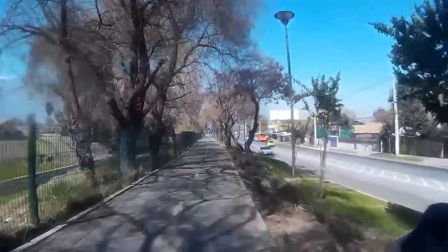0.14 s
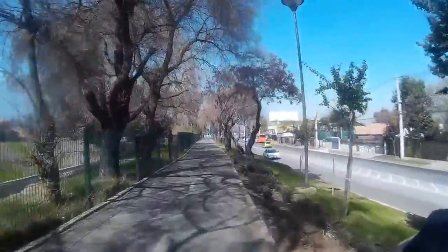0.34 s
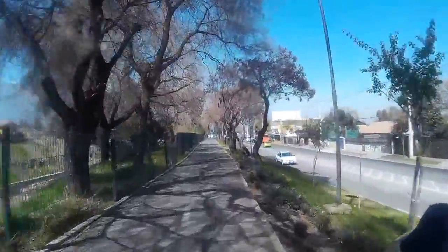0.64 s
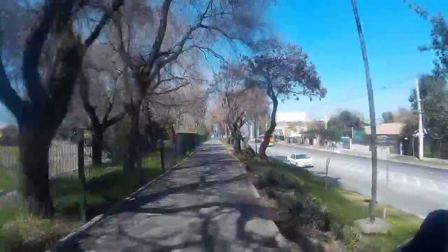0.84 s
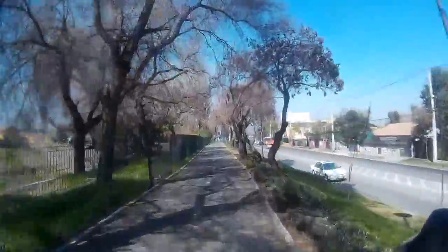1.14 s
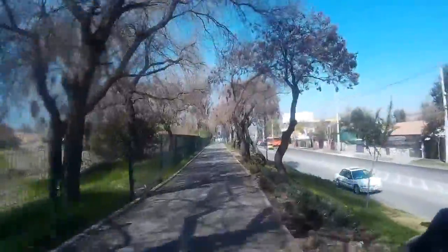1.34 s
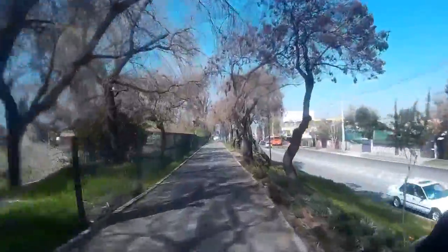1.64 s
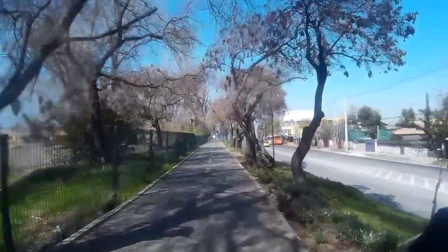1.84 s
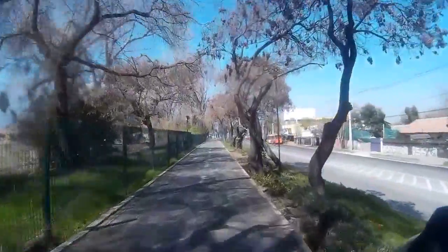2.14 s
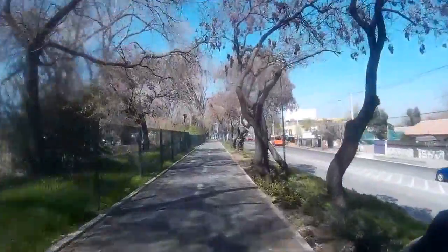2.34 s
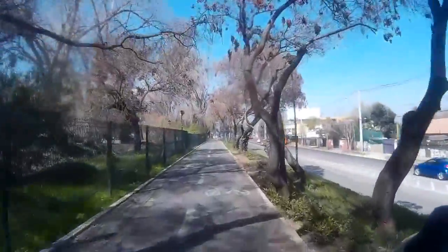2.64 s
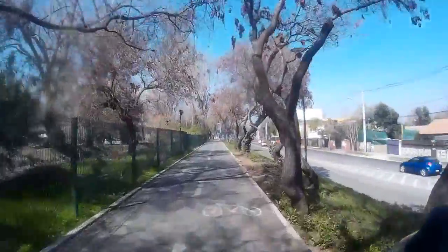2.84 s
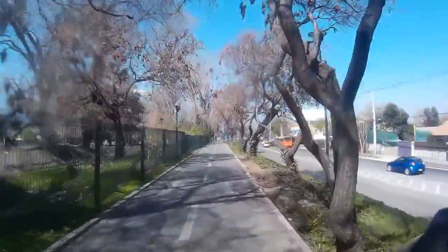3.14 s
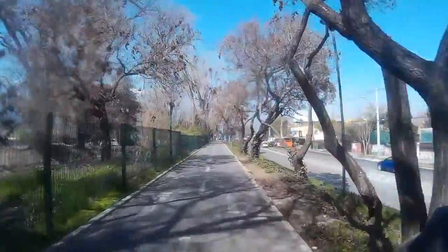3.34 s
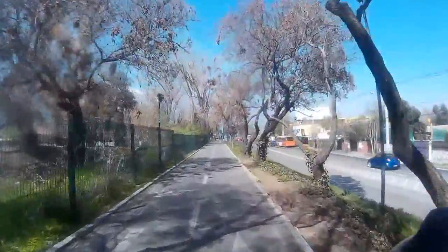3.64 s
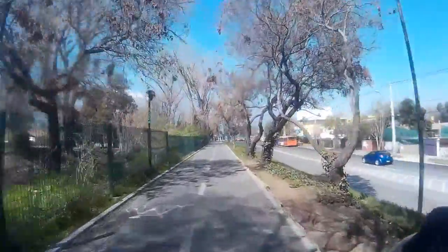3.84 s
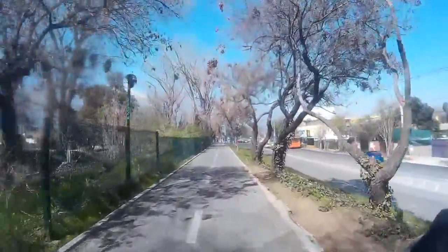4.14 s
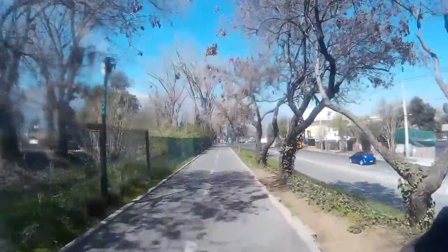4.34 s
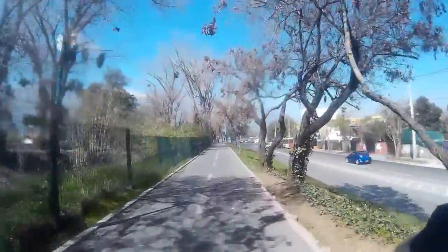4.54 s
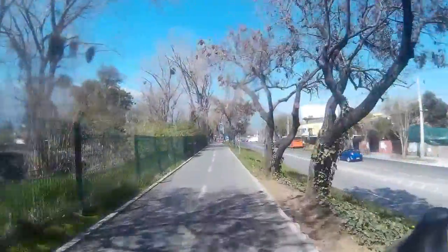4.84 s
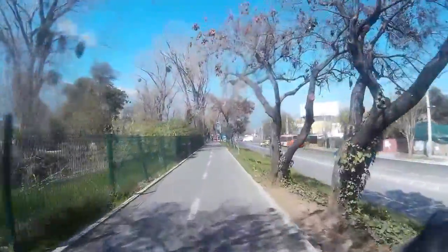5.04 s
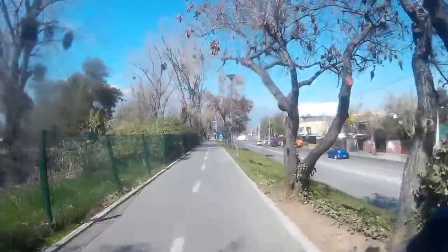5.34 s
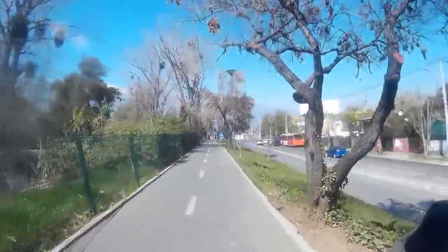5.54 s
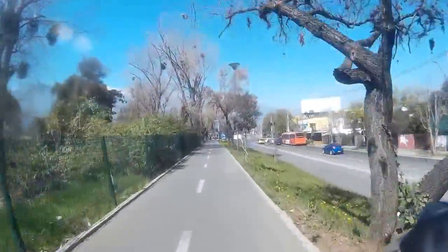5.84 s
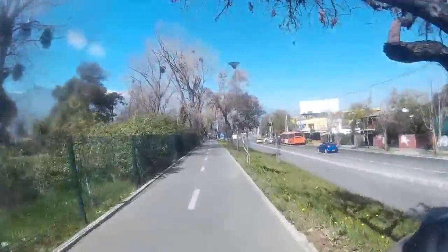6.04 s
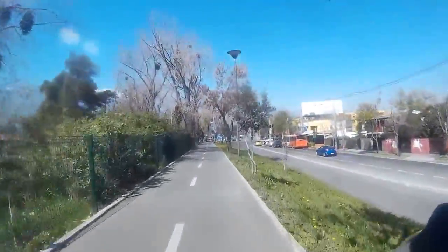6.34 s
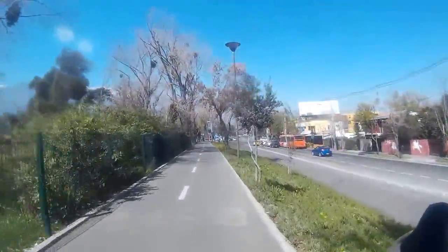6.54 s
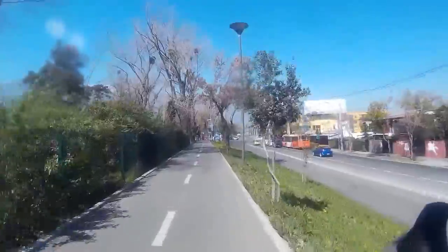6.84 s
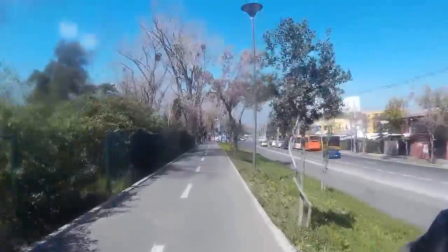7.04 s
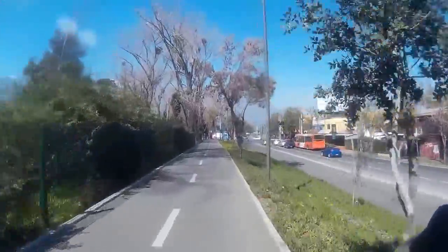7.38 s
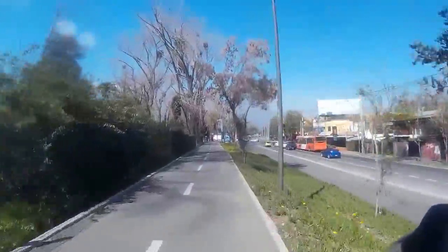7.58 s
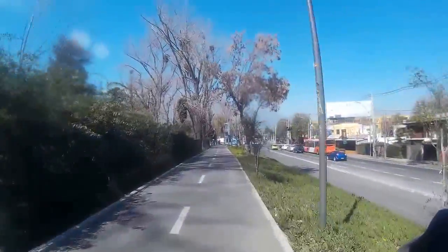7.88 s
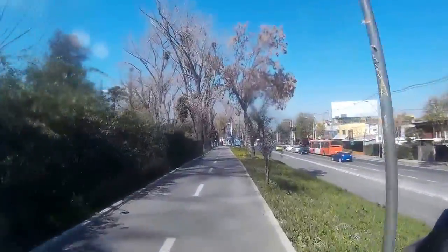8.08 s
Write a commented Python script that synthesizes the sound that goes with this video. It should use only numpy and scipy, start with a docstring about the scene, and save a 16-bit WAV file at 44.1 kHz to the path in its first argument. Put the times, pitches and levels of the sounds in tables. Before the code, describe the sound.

A bicycle rolls along a paved path with a muffled wavering low hum, rough road rumble, dull knocks and faint ticks over soft hiss.

```python
"""A low hum wavers and surges near 32 Hz, with rough road hum, small ticks, knocks and steady hiss.
A bicycle rolls along smooth asphalt, heard by a microphone shut in a case on the handlebar.
The mount swings as a wavering tone; road grain is noise coloured by the modes of frame and case.
Seams shake the fork, bumps knock the frame, and a loose part ticks on the big upswings.
Under it all lies the hiss of the preamp."""
import sys
import numpy as np
from scipy import signal
from scipy.fft import rfft, irfft, next_fast_len
from scipy.io import wavfile
from scipy.ndimage import map_coordinates

SR = 44100
rng = np.random.default_rng(int(sys.argv[2]) if len(sys.argv) > 2 else 0)


def boost_factor(decibels):
    """Convert a level in decibels to a linear amplitude factor."""
    exponent = np.asarray(decibels, float) / 20
    return 10 ** exponent


def transcribe(signal):
    """Save signal, clipped to [-1, 1], as a 16-bit WAV file at the path in sys.argv[1]."""
    frames = np.atleast_2d(signal).T
    limited = np.clip(frames, -1, 1)
    pcm = np.round(limited * 32767).astype(np.int16)
    wavfile.write(sys.argv[1], SR, pcm)


N = 362061  # length in samples

# The road kicks the mount into swells of swinging.
# Each row: time in seconds at which full level is reached, pitch in Hz,
# level of the tone in dB rms, hold in seconds.
SWING_SWELLS = [(0.0, 31.1, -29.5, .02), (0.155, 34.11, -31, .03), (0.375, 36.01, -29, .01),
                (0.54, 31.26, -23, 0.064), (0.714, 33, -27, .01), (0.823, 31.5, -24.5, .08),
                (0.987, 34.4, -23, 0.0091), (1.146, 32.3, -21, .01), (1.328, 34.06, -26.5, 0.1),
                (1.58, 37.05, -31, .03), (1.68, 30.6, -27.5, .01), (1.798, 35.26, -29, .01),
                (2.01, 31.33, -29.5, .04), (2.22, 36.75, -28, .01), (2.319, 33.6, -29, .01),
                (2.47, 33, -30, .02), (2.68, 33.1, -27, 0.037), (2.8, 31.74, -30.5, 0.075),
                (3.102, 39.6, -33, .01), (3.28, 33.9, -28, .01), (3.417, 35.8, -23.5, 0.055),
                (3.575, 37.4, -21.5, .01), (3.796, 31.2, -23, 0.062), (4.002, 31.64, -31.5, .01),
                (4.17, 36.2, -34, .01), (4.385, 34.5, -30, .03), (4.649, 30, -30.5, .01),
                (4.9, 33, -31.5, 0.19), (5.166, 32.4, -31.5, .02), (5.335, 33.3, -29.5, 0.099),
                (5.62, 31, -25, 0.17), (5.861, 34.3, -31, .06), (6.012, 33.8, -25, .01),
                (6.214, 33.9, -21.5, 0.037), (6.366, 34.52, -27, 0.023), (6.549, 34.14, -23.5, 0.038),
                (6.68, 31.73, -25.5, .02), (6.818, 34, -27, .12), (7.027, 34.05, -32, 0.067),
                (7.17, 32.9, -25, .1), (7.34, 31.5, -29, .02), (7.451, 33.16, -22.5, .02),
                (7.604, 31.5, -24.5, 0.087), (8.02, 39.6, -43, .02), (8.2, 35, -33, .01)]
SWELL_RISE_DB_PER_S, SWELL_SAG_DB_PER_S, SWELL_FALL_DB_PER_S = 229, 18, 149
SWING_REST_DB = -43  # the swing never gets quieter than this

# Modes of the mount. Each row: pitch in Hz, width in Hz, relative level in dB.
MOUNT_MODES = [(32.2, 13, 5), (44.4, 16, -12)]

# Slow sway of the handlebar. Each row: frequency in Hz, relative level in dB per Hz.
SWAY_SPECTRUM = [(8, -20), (16, -3.5), (24, -1), (32, -8), (45, -40), (90, -120)]
SWAY_DB = -43.5  # rms

# Coarseness of the asphalt. Each row: time in seconds, level in dB.
ROAD_GRAIN = [(0, -35.5), (.5, -37), (.85, -33), (2, -33.5), (3.1, -33.5), (3.5, -33), (4.3, -33),
              (5.1, -37), (5.5, -33.5), (6.1, -36.5), (6.4, -40), (7.3, -33.5), (7.7, -35), (8.21, -34.5)]

# How the grain reaches the fork jolts, then the low, middle, case and lid modes.
# Each row: level in dB over the mean grain, share of the grain's changes, own wavering in dB.
GRAIN_FELT = [(-9.5, 0.86, 1.5), (-0.57, 0.83, 0.77), (-10, 0.44, 0.8), (-12, 0.36, 1.5), (-27.5, 0.43, .5)]

# Jolts of the fork. Each row: frequency in Hz, relative level in dB per Hz.
FORK_JOLT_SPECTRUM = [(15, -23), (30, -8), (45, 2), (70, 2), (110, 0), (140, -15.5), (200, -50),
                      (400, -120)]

# Low modes of frame and case. Each row: pitch in Hz, width in Hz, relative level in dB.
LOW_MODES = [(144.4, 31.4, -5.5), (176.8, 33.7, -1), (229.6, 41.4, -0.5), (262.4, 25, 0.5),
             (291.4, 24.6, -2.5), (330, 24.6, -8), (386, 76.6, -12), (473.5, 16, -19)]
# Middle modes of frame and case. Each row: pitch in Hz, width in Hz, relative level in dB.
MIDDLE_MODES = [(534.2, 51, 1), (580.4, 46, 0), (627.4, 69, -0.5), (736, 185, -9), (825, 75, -4.5),
                (887, 83, -4), (990, 74, -12.5)]
# Modes of the case. Each row: pitch in Hz, width in Hz, relative level in dB.
CASE_MODES = [(1224.8, 89, -1.5), (1285, 79, -4.5)]
# Modes of the lid, lowest first. Each row: pitch in Hz, width in Hz, relative level in dB.
LID_MODES = [(1463, 64, 1), (1575, 236, -8.5), (1910, 640, -14.5), (2270, 520, -29)]

# Seams in the asphalt shake the fork for a moment. Each row: time in seconds, level in dB rms.
ROAD_SEAMS = [(0.09, -46), (1.53, -33.5), (1.65, -41), (1.96, -38.5), (2.45, -39), (2.93, -38), (3.45, -29),
              (3.57, -32), (3.7, -41), (5.26, -38), (5.42, -37), (5.69, -40), (6.04, -36.5), (6.22, -38.5),
              (6.4, -39.5), (6.54, -40), (8.03, -39)]
SEAM_RISE_DB_PER_S, SEAM_FALL_DB_PER_S = 160, 159
SEAM_IN_LOW_MODES_DB = -4.5  # against the shaking of the fork

# Uneven loudness of the noise in the case modes: moments when it is louder.
# Each row: time in seconds, level in dB rms.
CASE_LOUD_MOMENTS = [(0.2, -41), (0.64, -47.5), (0.87, -46), (1.53, -45), (2.52, -44), (3.02, -44.5),
                     (3.2, -46), (3.63, -42), (4.02, -40), (5.04, -45.5), (5.26, -43.5), (5.42, -47),
                     (5.83, -43.5), (6.04, -46), (6.22, -44.5), (6.97, -42.5)]
LOUD_MOMENT_RISE_DB_PER_S, LOUD_MOMENT_FALL_DB_PER_S = 127, 96

# Bumps knock the frame.
# Each row: time in seconds, then peak level in dB in the low, middle, case and lid modes.
BUMPS = [(0.246, -26.5, -35, -54, -49), (0.452, -28.5, -33, -42, -57), (0.575, -23, -25.5, -41, -44),
         (0.749, -21, -48, -51, -60), (0.909, -19.5, -50, -33, -54), (3.387, -20, -37, -38.5, -60),
         (3.454, -27, -40, -38.5, -59), (3.559, -23, -29, -42, -53), (4.399, -27, -34, -43, -62),
         (5.562, -20, -27.5, -52, -58), (5.69, -22.5, -42, -49, -57), (5.903, -31, -30, -47, -45),
         (6.502, -37, -47, -38, -60), (6.923, -32, -28, -44, -47), (7.644, -24, -42, -41, -42),
         (7.841, -21.5, -38, -33.5, -35), (7.964, -30, -30.5, -38.5, -47), (7.982, -40, -34, -45, -52)]
CHATTER_DB, CHATTER_GROWS = -54, 0.33  # buzz at a -54 dB knock of the lid, dB gained per dB of knock

# The loose part hits its stop. Each row: time in seconds, peak level of the ring in dB.
TICKS = [(0.5316, -56), (0.567, -65), (0.5959, -78), (0.701, -74), (0.838, -67), (0.8719, -71),
         (0.907, -67), (1.001, -66), (1.1395, -52), (1.171, -74), (1.2071, -73), (1.3, -70), (3.4215, -59),
         (3.453, -63), (3.4827, -73), (3.5865, -65), (3.781, -58), (3.8143, -57), (3.8452, -56),
         (5.697, -64.5), (6.2002, -52.5), (6.2313, -58.5), (6.5376, -70), (7.459, -72), (7.648, -63),
         (7.677, -59), (7.8425, -58)]
# Ring of the loose part. Each row: pitch in Hz, width in Hz, relative level in dB.
LOOSE_PART_MODES = [(3760, 330, 0.5), (3350, 370, -7.5), (4240, 400, -8), (2900, 460, -14),
                    (5500, 800, -20)]
# Duller ring of its stop. Each row: pitch in Hz, width in Hz, relative level in dB.
STOP_MODES = [(1696, 200, 1.5), (1900, 330, -0.5), (2230, 850, -16)]
STOP_DB, STOP_GROWS = -50.5, 0.25  # dull thud at a -63 dB ring, dB gained per dB of ring

# Colour of the preamp hiss. Each row: frequency in Hz, relative level in dB per Hz.
HISS_SPECTRUM = [(1760, -9.5), (3000, -1.5), (3830, -1.5), (5060, -3.5), (8840, -3.5), (14600, -3.5),
                 (15900, -8.5)]
HISS_DB = -73.5  # rms


def swing():
    """Pitch and level of the swing: each swell brings its pitch, over a faint steady rest level."""
    peak_at, hz, db, hold = np.transpose(SWING_SWELLS)
    power = swells(peak_at, db, SWELL_RISE_DB_PER_S, SWELL_FALL_DB_PER_S, hold, SWELL_SAG_DB_PER_S)
    pitch_hz = np.interp(np.arange(N) / SR, peak_at + hold / 2, hz)
    return pitch_hz, 10 * np.log10(power + boost_factor(2 * SWING_REST_DB))


def swing_turns(hz):
    """Cycles of the swing, nudged so that every tick falls at the same point of an upswing."""
    turns = np.cumsum(hz) / SR + 0.03 * wobble(9)
    tick_at = (np.array(TICKS)[:, 0] * SR).astype(int)
    # the nudge brings each tick to a whole number of turns
    nudge = np.unwrap(-turns[tick_at] % 1, period=1)
    return turns + np.interp(np.arange(N), tick_at, nudge)


def mount(turns, swing_db):
    """The mount swings as a tone cresting just after the tick, shaken by the road, over a deep sway."""
    angle = 2 * np.pi * (turns - 0.17)
    tone = np.sqrt(2) * (np.cos(angle) + 0.041 * np.cos(2 * angle))
    shake = boost_factor(-13) * coloured_noise(resonant(MOUNT_MODES))
    sway = boost_factor(SWAY_DB) * coloured_noise(points(SWAY_SPECTRUM))
    return boost_factor(swing_db) * (tone + shake) + sway


def road_hum():
    """Road grain drives fork and modes as noise; seams and louder moments of the case add power."""
    grain_s, grain_points_db = np.transpose(ROAD_GRAIN)
    grain_db = np.interp(np.arange(N) / SR, grain_s, grain_points_db)
    mean_db = grain_db.mean()
    shared_waver_db = 0.33 * wobble(13)
    gains = []
    for db, share, waver_db in GRAIN_FELT:
        own_waver_db = waver_db * wobble(12)
        level_db = mean_db + db + share * (grain_db - mean_db) + shared_waver_db + own_waver_db
        gains.append(boost_factor(level_db))
    fork, low, middle, case, lid = gains

    seams = swells(*np.transpose(ROAD_SEAMS), SEAM_RISE_DB_PER_S, SEAM_FALL_DB_PER_S)
    louder = swells(*np.transpose(CASE_LOUD_MOMENTS),
                    LOUD_MOMENT_RISE_DB_PER_S, LOUD_MOMENT_FALL_DB_PER_S)
    fork = np.sqrt(fork ** 2 + seams)
    low = np.sqrt(low ** 2 + seams * boost_factor(2 * SEAM_IN_LOW_MODES_DB))
    case = np.sqrt(case ** 2 + louder)

    hum = fork * coloured_noise(points(FORK_JOLT_SPECTRUM))
    hum += low * coloured_noise(resonant(LOW_MODES))
    hum += middle * coloured_noise(resonant(MIDDLE_MODES))
    hum += case * coloured_noise(resonant(CASE_MODES))
    hum += lid * coloured_noise(resonant(LID_MODES))
    return hum


def bump_knocks():
    """A bump knocks each group of modes briefly, and the loose part buzzes on its stop."""
    times, *dbs = np.transpose(BUMPS)
    # a soft blow reaches only the two lowest modes of the lid
    groups = [LOW_MODES, MIDDLE_MODES, CASE_MODES, LID_MODES[:2]]
    knocks = sum(struck(times, db, resonant(modes), soft=0.00034, fall=0.003, rough=0.25)
                 for db, modes in zip(dbs, groups))
    chatter_db = CHATTER_DB + CHATTER_GROWS * np.minimum(dbs[3] + 54, 6)
    chatter = struck(times, chatter_db, resonant(STOP_MODES), soft=0.0001, fall=0.004, rough=0.9)
    return knocks + chatter


def ticks(turns, swing_db):
    """The loose part rings and its stop thuds; every swing adds a dull touch that grows with it."""
    times, db = np.transpose(TICKS)
    stop = resonant(STOP_MODES)
    bright = struck(times, db, resonant(LOOSE_PART_MODES), soft=0.00004, fall=0.0013, rough=0.61)
    thud_db = STOP_DB + STOP_GROWS * (db + 63)
    dull = struck(times, thud_db, stop, soft=0.00008, fall=0.0015, rough=0.65)
    touch_at = np.flatnonzero(np.diff(np.floor(turns)) > 0)  # each new turn
    touch_db = -61 + 0.92 * (swing_db[touch_at] + 24.5) + 3 * wobble(30)[touch_at]
    touch = struck(touch_at / SR, touch_db, stop, soft=0.0001, fall=0.0027, rough=0.8)
    return bright + dull + touch


def preamp():
    """The preamp adds a steady, nearly white hiss."""
    return boost_factor(HISS_DB) * coloured_noise(points(HISS_SPECTRUM))


def struck(times, dbs, body, soft, fall, rough):
    """Blows into a body, each a push (soft, s) and scraping (fall, s); levels are peaks of its answer."""
    t = np.arange(SR // 40) / SR
    scrape = rng.standard_normal((len(times), len(t))) * np.exp(-t / fall) * t / fall
    push = t * np.exp(-t / soft)
    contact = (1 - rough) * unit(push) + rough * unit(scrape)
    ring = coloured(np.ones(1), body, size=4096)
    answers = signal.fftconvolve(contact, ring[None], axes=1)
    out = np.zeros(N + answers.shape[1])
    for s, db, answer in zip(times, dbs, answers):
        out[round(s * SR):][:len(answer)] += boost_factor(db) * answer / np.abs(answer).max()
    return out[:N]


def swells(peak_at, db, rise_db_per_s, fall_db_per_s, hold=0, sag_db_per_s=0):
    """Summed power of events that rise to full level at peak_at, sag slowly while held, then fall."""
    knots = np.arange(0, N, 100)  # worked out every 100 samples, joined by straight lines
    t = knots[:, None] / SR - peak_at
    rise = rise_db_per_s * np.minimum(t, 0)
    sag = sag_db_per_s * np.clip(t, 0, hold)
    fall = fall_db_per_s * np.maximum(t - hold, 0)
    power = boost_factor(2 * (db + rise - sag - fall)).sum(axis=1)
    return np.interp(np.arange(N), knots, power)


def unit(x):
    """Scales a sound to rms 1."""
    return x / np.sqrt(np.mean(x ** 2))


def wobble(rate):
    """A smooth random curve through rate random values a second."""
    values = rng.standard_normal(int(N * rate / SR) + 4)
    return map_coordinates(values, [np.arange(N) * rate / SR])


def coloured(x, gain, size=N):
    """Filters x by a gain against frequency, with no response ahead of its cause."""
    m = 2 * next_fast_len(size // 2 + 2048)
    # folding the cepstrum forward in time gives the minimum-phase filter
    cepstrum = irfft(np.log(gain(np.fft.rfftfreq(m, 1 / SR)) + 1e-6), m)
    cepstrum[1:m // 2] *= 2
    cepstrum[m // 2 + 1:] = 0
    return irfft(rfft(x, m) * np.exp(rfft(cepstrum)), m)[:size]


def coloured_noise(gain):
    """Random noise shaped by a gain against frequency, at rms 1."""
    return unit(coloured(rng.standard_normal(N), gain))


def points(table):
    """Gain read between (Hz, dB) points on a log frequency axis."""
    f, db = np.transpose(table)
    return lambda hz: boost_factor(np.interp(np.log(hz + 1), np.log(f + 1), db))


def resonant(modes):
    """Gain of a set of modes with steep skirts, their powers added."""
    def gain(hz):
        return np.sqrt(sum((boost_factor(db) / (1 + (2 * (hz - centre) / width) ** 2)) ** 2
                           for centre, width, db in modes))
    return gain


def scene():
    """Adds mount, road hum, knocks, ticks and hiss into one channel."""
    hz, swing_db = swing()
    turns = swing_turns(hz)
    mix = mount(turns, swing_db) + road_hum() + bump_knocks() + ticks(turns, swing_db) + preamp()
    return mix[None]


def top_cut(x):
    """Nothing passes above the cut-off."""
    return signal.sosfilt(signal.butter(12, 16040, fs=SR, output="sos"), x)


def record(dry):
    """Turns the finished mix into the sound that is written."""
    return top_cut(dry)


dry = scene()
out = record(dry)
transcribe(out)
```